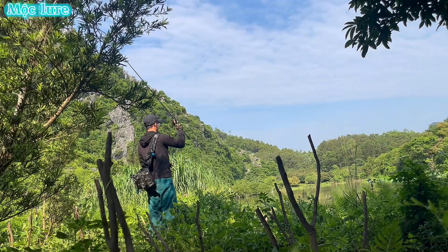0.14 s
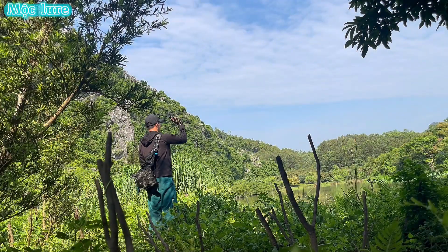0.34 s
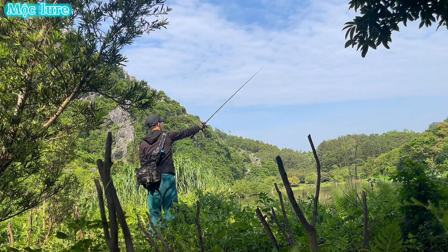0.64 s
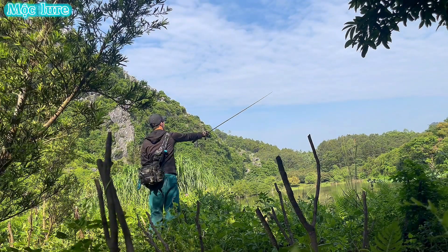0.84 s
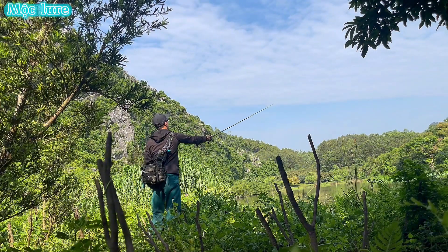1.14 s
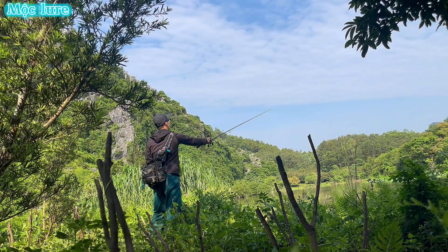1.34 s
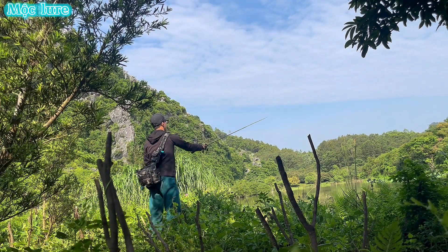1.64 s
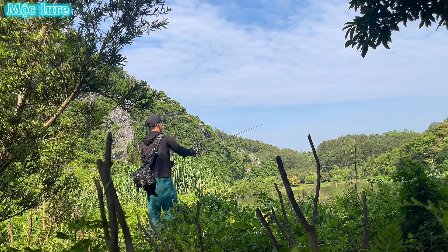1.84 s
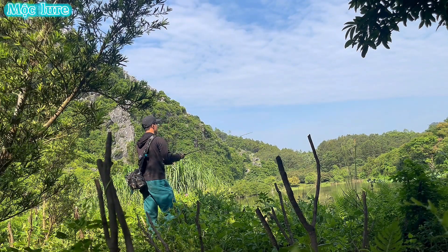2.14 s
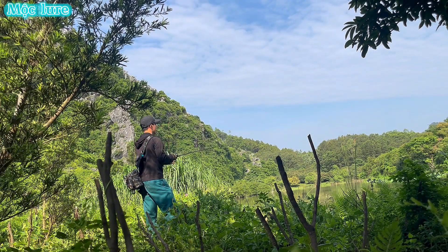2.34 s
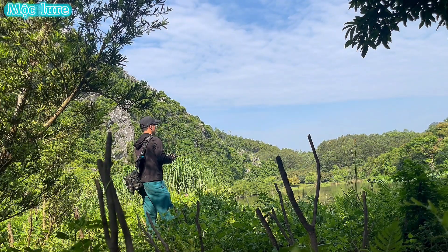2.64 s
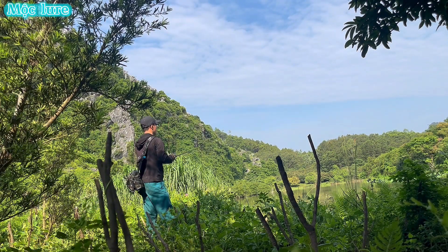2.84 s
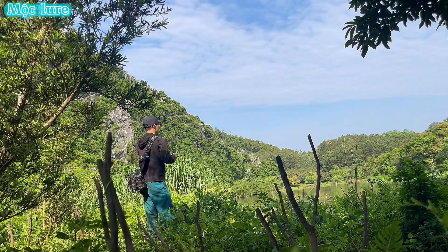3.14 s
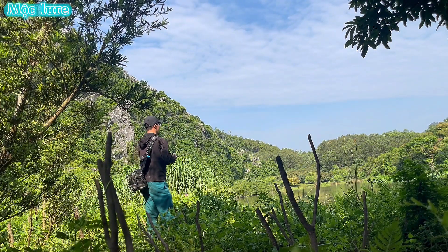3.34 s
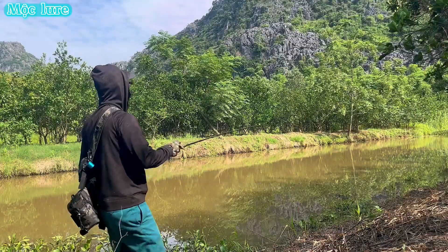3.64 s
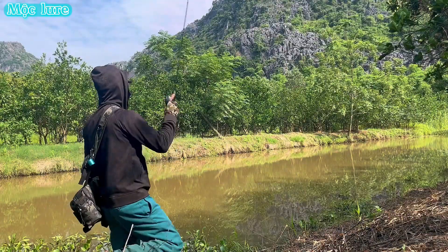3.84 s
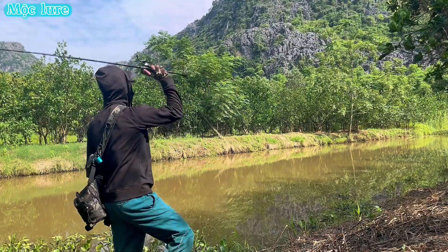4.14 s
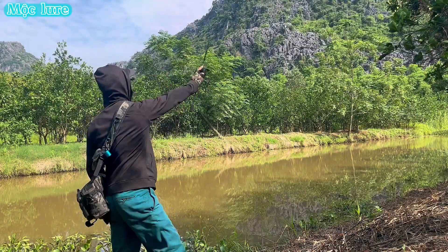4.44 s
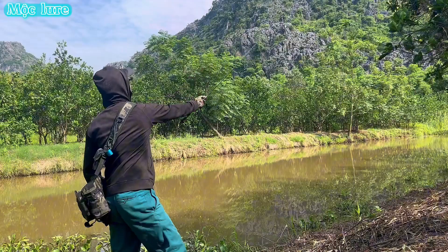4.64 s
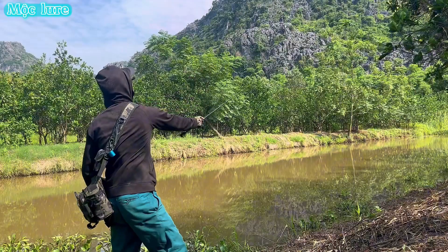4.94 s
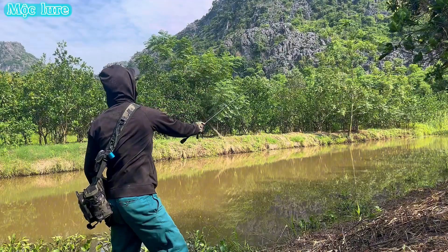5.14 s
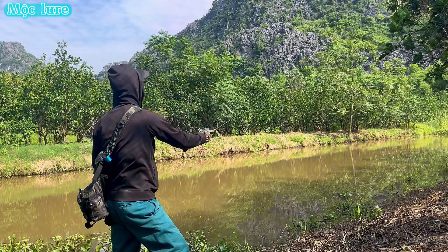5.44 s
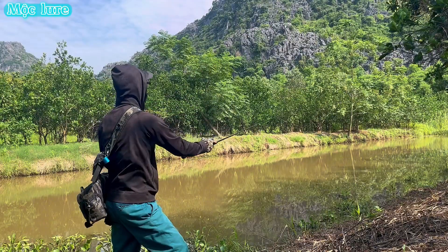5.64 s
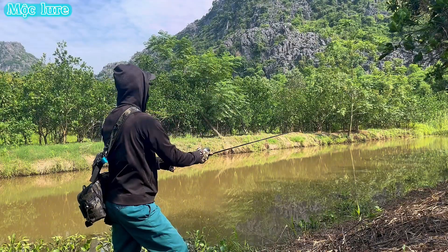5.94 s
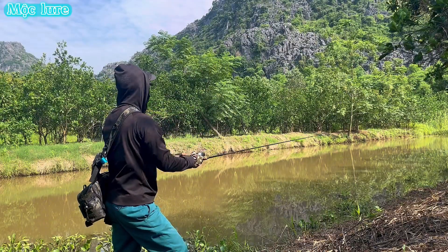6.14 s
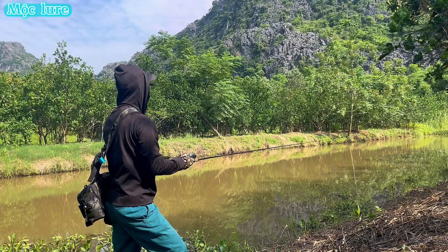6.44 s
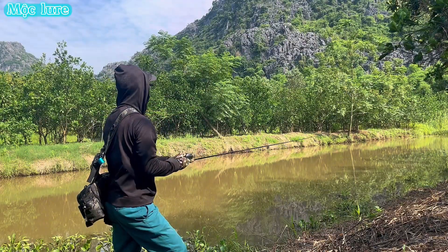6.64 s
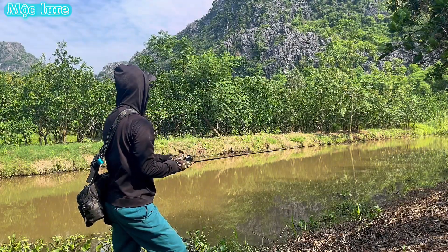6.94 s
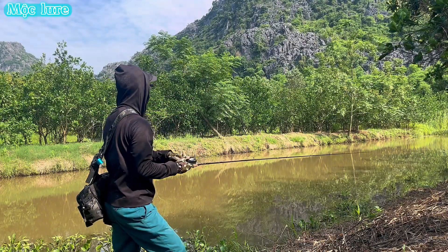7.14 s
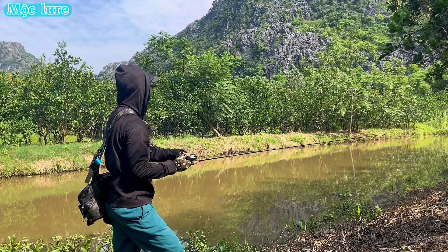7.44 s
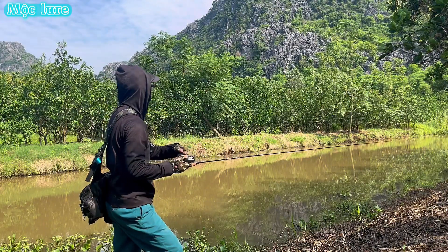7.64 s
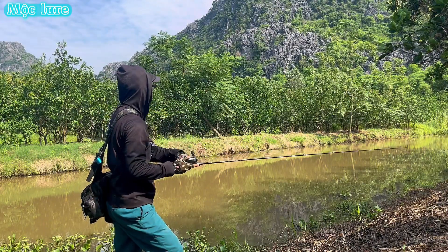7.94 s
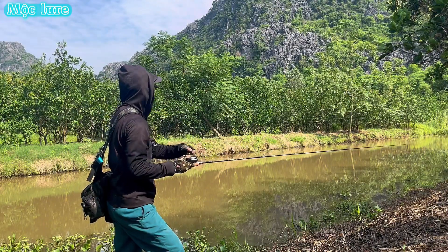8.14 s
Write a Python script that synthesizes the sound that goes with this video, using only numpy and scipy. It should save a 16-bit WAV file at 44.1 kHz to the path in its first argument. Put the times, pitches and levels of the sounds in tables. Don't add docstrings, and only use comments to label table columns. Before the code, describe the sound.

A loud cicada and cricket buzz over a breezy hillside as a fishing rod whooshes; then a quieter riverbank with a second cast and reel clicks.

```python
import sys
import numpy as np
from scipy import signal
from scipy.fft import rfft, irfft, next_fast_len
from scipy.io import wavfile
from scipy.ndimage import uniform_filter1d

SR = 44100
rng = np.random.default_rng(int(sys.argv[2]) if len(sys.argv) > 2 else 0)


def dump_mix(stems):
    frames = np.atleast_2d(stems).T
    limited = np.clip(frames, -1, 1)
    pcm = np.round(limited * 32767).astype(np.int16)
    wavfile.write(sys.argv[1], SR, pcm)


def voltage_ratio(level):
    return 10 ** (np.asarray(level, float) / 20)


N = 365588
T = np.arange(N) / SR
FAST = next_fast_len(N)

HILL_END_S, RIVER_START_S = 3.4405, 3.463
PORT_LAG_SAMPLES = 18

# (frequency [Hz], density [dB/Hz])
HILL_LOW_SPECTRUM = [(18, -52), (30, -11.5), (75, 0.5), (174, -13.5), (214, -20), (660, -33.5),
                     (916, -28.5), (1730, -27.5), (1880, -21), (2300, -19), (2940, -18.5), (3330, -23),
                     (4000, -28.5), (5200, -44), (8800, -120)]
# (frequency [Hz], density [dB/Hz])
HILL_LEAF_SPECTRUM = [(3530, -49), (6000, -47), (6510, -2.5), (6870, -3), (7110, -4), (7430, 1.5),
                      (7750, -4.5), (10300, 0), (11200, -11), (14600, -108), (22000, -120)]
# (frequency [Hz], density [dB/Hz])
HILL_SIDE_SPECTRUM = [(3530, -29), (6000, -4.5), (7400, -10.5), (7800, -41), (8300, -83), (10000, -11),
                      (14100, -24), (15200, -33.5), (16000, -86)]
# (frequency [Hz], density [dB/Hz])
RIVER_LOW_SPECTRUM = [(18, -27), (30, -20), (53, 0), (82, 0.5), (118, -5), (154, -9.5), (203, -11.5),
                      (237, -16.5), (909, -28), (1200, -26), (1560, -42), (2640, -120)]
# (frequency [Hz], density [dB/Hz])
RIVER_HIGH_SPECTRUM = [(3180, -43), (5400, 1), (5700, -0.5), (6390, -4), (7660, -6), (8510, -6), (9620, -7),
                       (10000, -10), (10400, -5), (11400, -15), (12300, -27), (13800, -23.5), (16000, -49)]
# (frequency [Hz], share from ahead [0-1], share from aside [0-1])
LIKENESS = [(61, 1, 0.0015), (200, 0.81, 0.0091), (720, 0.04, 0.5), (2490, 0.086, 0.59), (6000, 0.35, 0.3),
            (15000, 0.1, 0.0032)]
# (time [s], level [dB])
GUST = [(0, -5), (.55, 3), (.9, -1), (1.36, 0), (1.79, -1), (2.2, 0.5), (2.53, 5.5), (2.9, 0), (3.3, -1),
        (3.44, 3)]
# (time [s], level [dB])
STIR = [(3.47, 16), (3.8, 9.5), (4.0, 5.5), (4.34, 16), (4.65, 0.5), (5.15, -3), (5.9, -2), (6.6, -2.5),
        (8.29, 2)]
# (time [s], level [dB], frequency [Hz], length [s])
PUFFS = [
    (6.336, -46.5, 50, 0.15),
    (6.953, -46, 95, 0.037),
    (4.48, -38, 110, 0.026),
    (4.21, -46, 110, 0.026),
]

# (start [s], length [s], top level [dB], dip [Hz])
BIRD = [
    (2.27, 0.058, -51.5, 100),
    (2.736, .185, -38, 1040),
    (3.04, .18, -44, 958),
]
# (start [s], length [s], from [Hz], to [Hz], top level [dB])
CHIRPS = [
    (2.58, 0.055, 2260, 2650, -41.5),
    (2.712, 0.027, 525, 567, -48),
]
# (start [s], length [s], from [Hz], to [Hz], top level [dB])
FOWL = [(1.33, 0.1, 1384, 1330, -51), (1.43, 0.081, 1320, 1236, -48), (1.515, 0.13, 1400, 1345, -50),
        (2.55, 0.11, 1370, 1360, -48), (2.635, .075, 1290, 1100, -44), (2.99, .07, 1385, 1325, -52),
        (3.24, .11, 1353, 1310, -48), (.99, .07, 1400, 1360, -56)]
# (centre [Hz], width [Hz], level [dB], clicks [1/s], throbs [1/s], throb depth [0-1], first throb [s])
CHOIRS = [
    (1680, 344, -58, 110, 0, 0.1, 0),
    (3256, 800, -51, 135, 0, 0.09, 0),
    (2330, 710, -65.5, 150, 0, 0.41, 0),
    (4670, 410, -54.5, 95, -1.5, 0.08, 0),
    (9600, 860, -72, 180, 9, 0.6, 9),
]
# (time [s], level [dB])
KATYDIDS = [(3.47, -85), (3.85, -55), (6.7, -53.5), (6.9, -69), (8.29, -61)]
# (start [s], end [s], strokes at the start [1/s])
CRICKET = [
    (.0073, .968, 30.41),
    (1.3255, 1.425, 30.2),
    (1.5242, 1.622, 30.62),
    (1.6875, 3.44, 30.695),
]
# (level [dB], pitch [Hz])
CRICKET_VOICE = [(-45.5, 7300), (-46.5, 7230), (-46, 7280), (-46, 7290)]
# (centre [Hz], width [Hz], level [dB])
CICADA_BODY = [(4832, 400, 0.5), (5168, 360, 2), (5415, 356, 0.5)]
# (time [s], level [dB])
CICADA_EFFORT = [(0, -35), (.3, -38), (1.2, -39.5), (1.4, -38), (2.0, -39), (2.6, -36.5), (3.44, -38.5)]

# (time [s], peak [dB], ring [Hz], crack [dB])
KNOCKS = [(1.925, -45, 371, -5), (2.437, -36.5, 476, -1.5), (2.934, -33, 350, -9.5),
          (3.056, -37, 1020, -7.5), (3.251, -33, 506, -3.5), (3.397, -37.5, 420, 1),
          (3.415, -37, 790, -0.5), (3.604, -48, 1130, -4), (3.7, -49.5, 1180, -2), (3.819, -64, 937, 10),
          (3.885, -48, 342, -1), (4.192, -22.5, 500, -18), (6.965, -55.5, 810, 3.5)]
# (time [s], peak [dB], ring [Hz], crack [dB], bright snap [dB])
TICKS = [(0.3291, -22.5, 2060, -4, -7.5), (0.4294, -24.5, 2300, -11, -27), (0.7327, -25, 2030, -11, -25),
         (0.9168, -24, 2000, -13, -25), (0.9317, -30.5, 3060, -3, 6.5), (1.3628, -31, 1980, -10, -15),
         (1.8617, -27, 3050, -6, -24), (2.578, -33, 3040, -7, -9), (2.6214, -27, 3060, -9, -12),
         (2.6498, -20.5, 2040, -13, -25), (3.1472, -29.5, 2123, -2, -12), (3.1755, -18, 2860, -6, -10),
         (3.4801, -24, 2970, 2.5, -12.5), (4.4817, -20, 1340, -10, -16), (6.8802, -31, 1820, -4, -19),
         (6.9401, -26.5, 1790, -4.5, -13), (6.9646, -32, 1690, -3, -14)]
# (start [s], length [s], from [Hz], to [Hz], top level [dB])
SPOOL = [(.6, .75, 1950, 1980, -55), (.7, .23, 1400, 1760, -59), (.94, .56, 1890, 1450, -50),
         (.72, .23, 1300, 1310, -64), (4.95, .19, 1874, 1680, -56), (4.98, .22, 1100, 1260, -76)]
# (start [s], length [s], from [Hz], to [Hz], top level [dB])
TIP = [
    (.516, .031, 850, 1500, -30.5),
    (.52, 0.0794, 487, 170, -42.5),
    (4.4335, 0.0077, 3600, 5500, -33),
    (3.171, 0.017, 1715, 1685, -28),
    (3.852, .018, 6300, 6600, -53),
]
# (start [s], hold [s], level [dB])
SLEEVES = [
    (.48, .13, -54),
    (4.18, .15, -55),
]
# (start of full speed [s], hold [s], whoosh [dB], whoosh pitch [Hz], line [dB])
SWEEPS = [
    (.528, 0.052, -36, 1040, -35),
    (.595, .09, -50, 900, -53),
    (4.196, .022, -32.5, 600, -43.5),
    (4.272, .03, -47, 800, -55),
    (4.428, .054, -37, 800, -33),
]
# (hill [dB], river [dB])
LINE_HISS_DB = (3.5, -4)
# (hill [dB], river [dB])
FLAP_DB = (-5, 2)


def level(x, db):
    return x * voltage_ratio(db) / np.sqrt(np.mean(x ** 2))


def column(rows, k):
    return np.interp(T, *np.array(rows, float)[:, [0, k]].T)


def on_log(rows, k):
    hz = np.maximum(np.fft.rfftfreq(FAST, 1 / SR), 1)
    return np.interp(np.log(hz), np.log(np.array(rows)[:, 0]), np.array(rows)[:, k])


def walk(rate, size=N):
    hold = int(SR / rate)
    steps = np.repeat(rng.standard_normal(size // hold + 1), hold)
    return 1.3 * uniform_filter1d(uniform_filter1d(steps, hold), hold)[:size]


def band(x, hz, width_hz):
    b, a = signal.iirpeak(hz, hz / width_hz, SR)
    return signal.lfilter(b, a, signal.lfilter(b, a, x))


def steep(x, lo_hz, hi_hz):
    return signal.sosfilt(signal.butter(5, [lo_hz, hi_hz], "band", fs=SR, output="sos"), x)


def colour(x, spectrum, db):
    return level(irfft(x * voltage_ratio(on_log(spectrum, 1)), FAST)[..., :N], db)


def ports(x, pan_db=0, lag=PORT_LAG_SAMPLES):
    return np.array([x * voltage_ratio(pan_db / 2), np.roll(x, lag) * voltage_ratio(-pan_db / 2)])


def clicks(rate, jitter, scatter_db):
    chance = rng.standard_normal((int(2 * rate * N / SR), 2))
    at = np.cumsum(SR / rate * np.exp(jitter * chance[:, 0])).astype(int)
    size = voltage_ratio(scatter_db * chance[:, 1]) * np.sign(chance[::-1, 1])
    x = np.zeros(N)
    x[at[at < N]] = size[at < N]
    return x


def glides(rows, peak, bend, rise_db, fall_db, db_per_khz=0):
    calls = []
    for start_s, length_s, from_hz, to_hz, db in rows:
        s = start_s + length_s * np.array([0, peak, 1])
        hz = from_hz + (to_hz - from_hz) * np.array([0, bend, 1])
        top_db = db + np.array([rise_db, 0, fall_db]) + db_per_khz / 1000 * (hz - hz.max())
        calls.append(np.transpose([s, hz, top_db]))
    return calls


def whistles(calls, wobble_hz, rough_db, partials=((1, 0),)):
    out = np.zeros(N)
    for call in calls:
        s, hz, db = np.transpose(call)
        at = slice(int(s[0] * SR), int(s[-1] * SR))
        wobble, rough = [walk(84.0, size=SR)[:len(T[at])] for _ in range(2)]
        pitch = uniform_filter1d(np.interp(T[at], s, hz), size=200) + wobble_hz * wobble
        turn = 2 * np.pi * np.cumsum(pitch) / SR
        tone = sum(voltage_ratio(p_db) * np.sin(k * turn) for k, p_db in partials)
        tone = tone * signal.windows.tukey(len(turn), .15)
        out[at] += np.sqrt(2) * tone * voltage_ratio(np.interp(T[at], s, db) + rough_db * rough)
    return out


def hits(rows, lo_hz, hi_hz, t60_s, crack_s, trim_db):
    out, t = np.zeros(N), T[:4096]
    for (s, db, hz, crack_db, snap_db), noise in zip(rows, rng.standard_normal((len(rows), 4096))):
        ring = np.sin(2 * np.pi * hz * t) * voltage_ratio(-60 * t / max(t60_s, .004)) * np.minimum(t / 0.00084, 1)
        burst = noise * np.exp(-t / crack_s)
        crack = voltage_ratio(crack_db) * 3 * steep(burst, lo_hz, hi_hz)
        snap = burst * np.exp(-t / 0.0045)
        snap = steep(snap, 7100, 11200) + .3 * steep(snap, 13700, 15600)
        start = int(s * SR)
        out[start:start + 4096] += voltage_ratio(db + trim_db) * (ring + crack + voltage_ratio(snap_db) * 3 * snap)
    return out


def air(spectrum, db, low_db, mid_db):
    ahead, aside = np.clip(on_log(LIKENESS, 1), 0, 1), np.clip(on_log(LIKENESS, 2), 0, 1)
    apart = np.clip(1 - ahead - aside, 0, 1)
    noise = rng.standard_normal((4, FAST))
    mix = np.sqrt(ahead) * rfft(noise[0]) + np.sqrt(aside) * rfft(ports(noise[1]))
    x = colour(mix + np.sqrt(apart) * rfft(noise[2:]), spectrum, db)
    low, mid = (signal.sosfiltfilt(signal.butter(2, hz, fs=SR, output="sos"), x) for hz in (220, 1600))
    flicker_db = 1.5 * walk(7.9)
    rumble = low * voltage_ratio(low_db + flicker_db)
    middle = (mid - low) * voltage_ratio(mid_db + flicker_db / 2 + walk(11.0))
    return rumble + middle + (x - mid) * voltage_ratio(0.23 * walk(12))


def hiss(spectrum, db, swell_db):
    return colour(rfft(rng.standard_normal(FAST)), spectrum, db) * voltage_ratio(swell_db + 1.25 * walk(13))


def leaves(gust_db):
    centre = hiss(HILL_LEAF_SPECTRUM, -49.5, 0.43 * gust_db)
    centre = steep(steep(centre, 4200, 14000), 4000, 11200)
    return centre + hiss(HILL_SIDE_SPECTRUM, -49, 0.61 * gust_db) * np.array([[1], [-1]])


def glints():
    bands = []
    for hz in range(13700, 15700, 340):
        bands.append(steep(rng.standard_normal(N), hz, hz + 330) * (walk(22) > .15))
    return level(sum(bands), -69.5)


def wind_puffs():
    out = np.zeros(N)
    for s, db, hz, length_s in PUFFS:
        out += voltage_ratio(db) * np.exp(-((T - s) / (length_s / 2)) ** 2) * np.sin(2 * np.pi * hz * T)
    return out


def choir(hz, width_hz, rate):
    singers = []
    for k in range(2):
        ribs = clicks(rate * (9 + 2 * k), .5, 2.96)
        singers.append(band(ribs, hz + 0.11 * width_hz * (2 * k - 1), width_hz))
    return level(sum(singers), 0)


def river_insects():
    out = 0
    for hz, width_hz, db, rate, throb_hz, depth, first_s in CHOIRS:
        pulse = 1 + depth * np.cos(2 * np.pi * throb_hz * (T - first_s))
        out = out + voltage_ratio(db + 0.27 * walk(5.4)) * pulse * choir(hz, width_hz, rate)
    pulse = (0.62 + 0.55 * np.cos(2 * np.pi * 5.44 * (T - 5.6))) * voltage_ratio(1.3 * walk(20))
    return out + pulse * voltage_ratio(column(KATYDIDS, 1)) * choir(4960, 440, 110)


def fowl():
    return whistles(glides(FOWL, .5, .5, -7, -5), 22, 3, partials=((1, -3), (.85, -20), (1.52, -20)))


def bird():
    base_hz, loud_hz, db_per_khz = 2630, 2430, 33
    u = np.linspace(0, 1, 24)
    calls = []
    for start_s, length_s, db, dip_hz in BIRD:
        hz = base_hz + 90 * (u - .5) - dip_hz * np.sin(np.pi * u ** 0.79) ** 1.7
        faint_db = db_per_khz / 1000 * np.minimum(hz - loud_hz, 0)
        calls.append(np.transpose([start_s + length_s * u, hz, db + faint_db + 5 * (u - .8) - 9 * u ** 12]))
    return whistles(calls + glides(CHIRPS, 0.42, .5, -13, -12), 8.7, 0.6)


def cricket():
    tires = .285
    warm_s, warm_db, warm_hz = .06, -3.5, -120
    bout = np.maximum(np.searchsorted(np.array(CRICKET)[:, 0], T) - 1, 0)
    start, end, rate = np.array(CRICKET)[bout].T
    db, hz = np.array(CRICKET_VOICE, float)[bout].T
    age = T - start
    cold = np.exp(-age / warm_s)
    cycle = (rate * age - tires * age ** 2 / 2 + .03 * walk(9)) % 1 - .5
    pitch = hz + 25 * walk(14) + warm_hz * cold - 900 * np.clip(cycle, -.05, .3)
    tone = np.sin(2 * np.pi * np.cumsum(pitch) / SR)
    stroke = level(np.exp(-(cycle / .19) ** 4) * voltage_ratio(1.5 * walk(30)) * tone, 0)
    stroke = stroke * voltage_ratio(db + warm_db * cold + 1.1 * walk(2.96)) * (T < end)
    echo = .2 * np.roll(stroke, int(0.0119 * SR))
    return ports(stroke + echo, pan_db=2.5, lag=5.2)


def cicada():
    stroke = np.cumsum(101 * (1 + .05 * walk(25))) / SR % 1
    near_ribs = clicks(1700, .5, 1.6) * (0.76 + np.exp(-stroke / 0.3))
    ribs = [near_ribs, clicks(3000, 0.48, 1.8), clicks(3100, .6, 2.3)]
    body = sum(voltage_ratio(db + .8 * walk(18)) * band(ribs, hz, width_hz) for hz, width_hz, db in CICADA_BODY)
    song = steep(body, 3840, 6200)
    near = ports(level(song[0], -1.5) * voltage_ratio(.6 * walk(25)), pan_db=-13)
    far = level(song[1:], 0) * voltage_ratio(np.array([[-2.5], [0]]))
    return (near + far) * voltage_ratio(column(CICADA_EFFORT, 1) + 1.3 * walk(16))


def knocks():
    return hits([(*row, -22) for row in KNOCKS], 390, 1750, t60_s=0.03, crack_s=0.018, trim_db=-2)


def spool():
    return whistles(glides(SPOOL, .45, .6, -2, -2, db_per_khz=38), 9, 1.6)


def reel_ticks():
    return hits(TICKS, 1790, 3930, t60_s=0.025, crack_s=0.0032, trim_db=-3.5)


def cloth(stir_db):
    fibres = steep(clicks(7000, .8, 2.5), 13600, 15400)
    return level(fibres, -80 + stir_db - 2.2 * (T - RIVER_START_S)) * (T > RIVER_START_S)


def sweep(start_s, hold_s):
    before, after = np.maximum(start_s - T, 0), np.maximum(T - start_s - hold_s, 0)
    return voltage_ratio(np.maximum(-800 * after, -17 - 110 * after) - 700 * before)


def casts():
    grains = clicks(5000, .8, 1.1)
    crackle = level(band(grains, 2100, 2260), 0)
    bright = band(steep(grains, 3500, 12200), 9140, 4000) + .5 * steep(grains, 13840, 15400)
    sizzle = level(bright, 0) * voltage_ratio(2.2 * walk(140))
    flap = level(steep(clicks(1800, .8, 3.6), 150, 1290), -6)
    shed, flutter = walk(600), voltage_ratio(1.3 * walk(90))
    rod = whistles(glides(TIP, .62, .45, -15, -12), 20, 2)
    line = sizzle * sum(voltage_ratio(db) * sweep(s, hold_s) for s, hold_s, db in SLEEVES)
    for s, hold_s, db, hz, line_db in SWEEPS:
        place = int(s > RIVER_START_S)
        pitch = hz * (1 + .3 * np.tanh((T - s - hold_s / 2) / .03))
        whoosh = level(shed * np.cos(2 * np.pi * np.cumsum(pitch) / SR), -4.5)
        rod = rod + flutter * (whoosh + flap * voltage_ratio(FLAP_DB[place])) * voltage_ratio(db) * sweep(s, hold_s)
        early = crackle * sweep(s + .18 * hold_s, hold_s * 0.8)
        late = sizzle * voltage_ratio(LINE_HISS_DB[place]) * sweep(s + .66 * hold_s, hold_s * 0.35)
        line = line + flutter * (early + late) * voltage_ratio(line_db)
    return rod, line


def scene():
    gust_db, stir_db = column(GUST, 1), column(STIR, 1)
    rod, line = casts()
    tackle = line + cloth(stir_db) + reel_ticks() + spool()
    ground = knocks()

    hill = air(HILL_LOW_SPECTRUM, -42, 0.95 * gust_db + 0.19, 1.03 * gust_db + 0.27)
    hill = hill + leaves(gust_db) + glints() + cicada() + cricket()
    hill = hill + ports(fowl(), pan_db=3.5) + ports(bird() * voltage_ratio(6), pan_db=1, lag=2.8)
    hill = hill + ports(ground, pan_db=5.5, lag=16.3)
    hill = hill + ports(tackle, pan_db=1.0, lag=0.98) + ports(rod, pan_db=1.0, lag=9.9)

    river = air(RIVER_LOW_SPECTRUM, -61.5, 0.21 * stir_db + 1.5 * walk(3), 0.71 * stir_db - 0.3)[1]
    river = river + hiss(RIVER_HIGH_SPECTRUM, -60, 0.18 * stir_db)
    river = river + river_insects() + wind_puffs() + ground + tackle + rod

    hill_gain = np.clip((HILL_END_S - T) / 0.00073, .06, 1) * (T < RIVER_START_S)
    return hill * hill_gain + river * (T >= RIVER_START_S)


def top_cut(x):
    return signal.sosfilt(signal.butter(12, 16640, fs=SR, output="sos"), x)


def record(dry):
    return top_cut(dry)


dry = scene()
out = record(dry)
dump_mix(out)
```